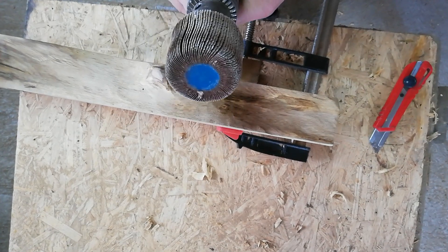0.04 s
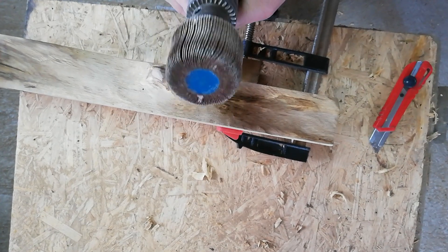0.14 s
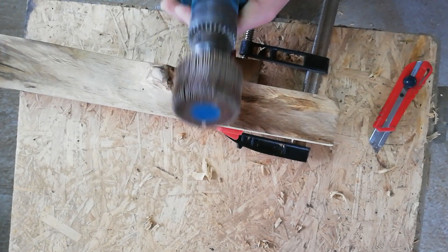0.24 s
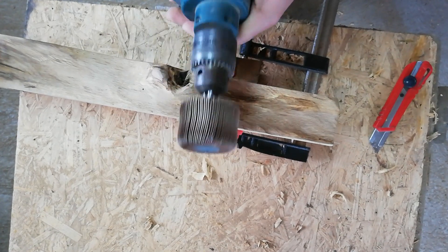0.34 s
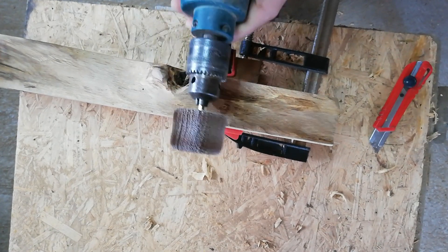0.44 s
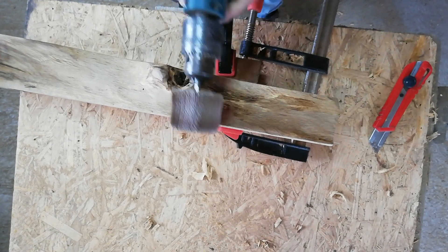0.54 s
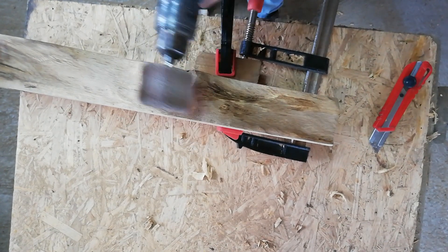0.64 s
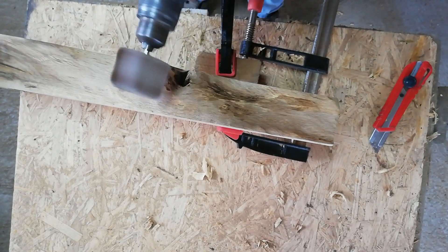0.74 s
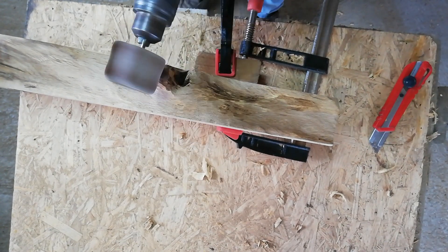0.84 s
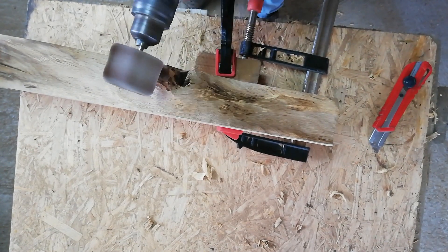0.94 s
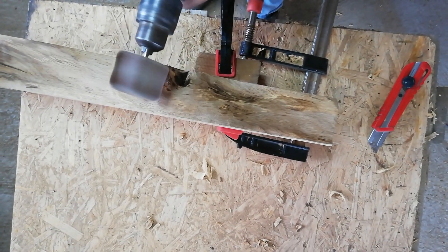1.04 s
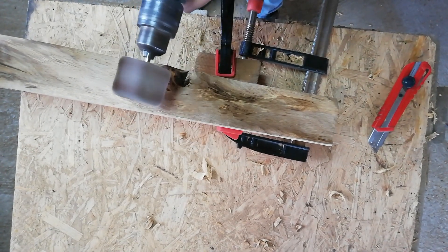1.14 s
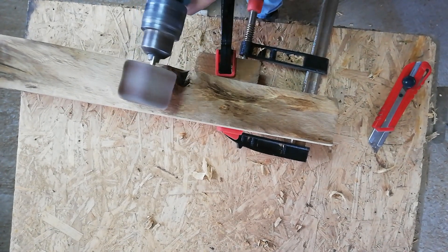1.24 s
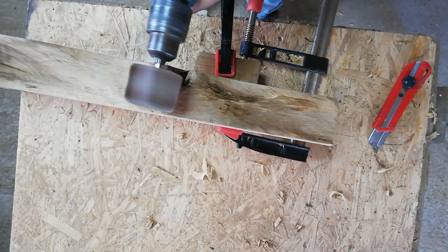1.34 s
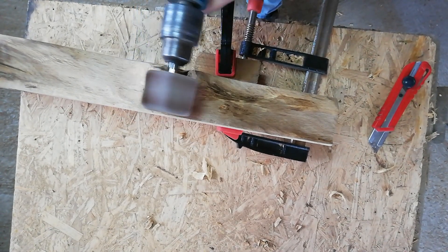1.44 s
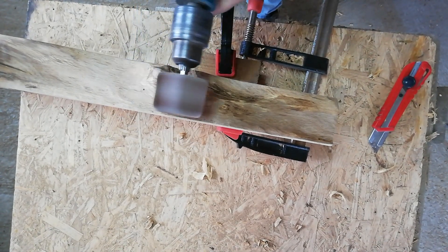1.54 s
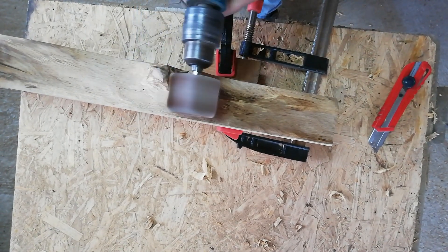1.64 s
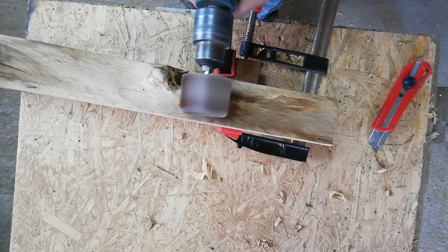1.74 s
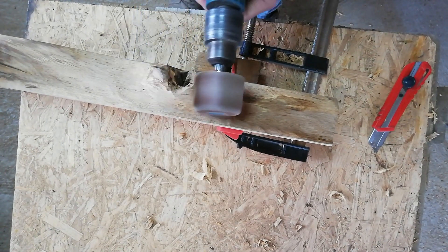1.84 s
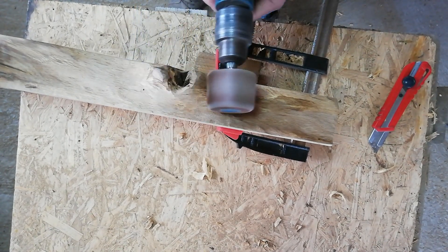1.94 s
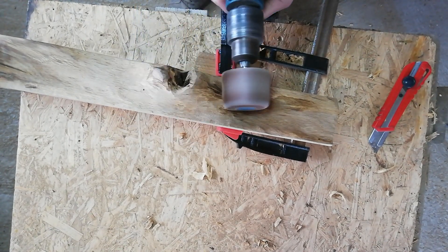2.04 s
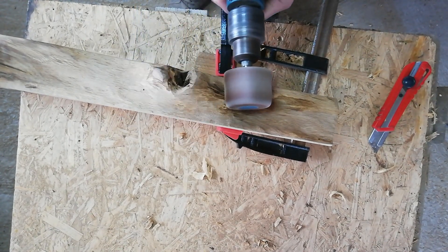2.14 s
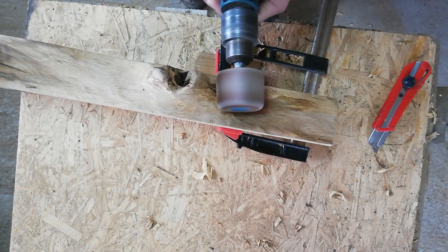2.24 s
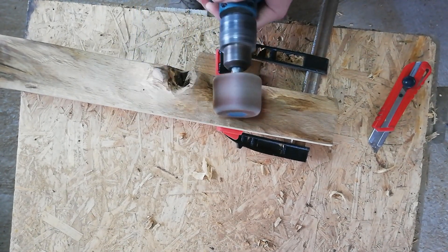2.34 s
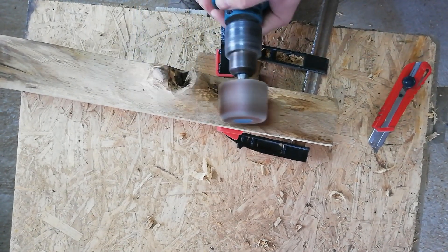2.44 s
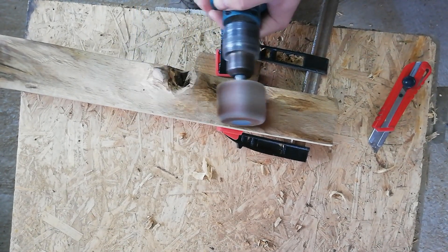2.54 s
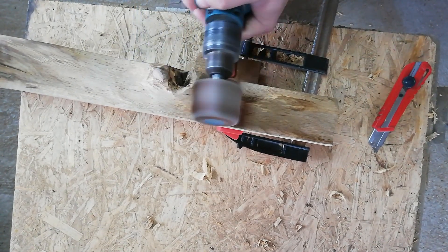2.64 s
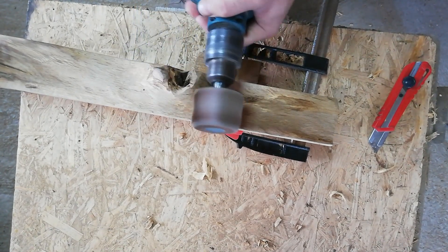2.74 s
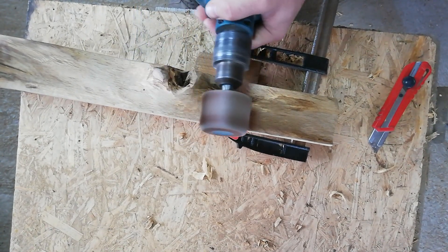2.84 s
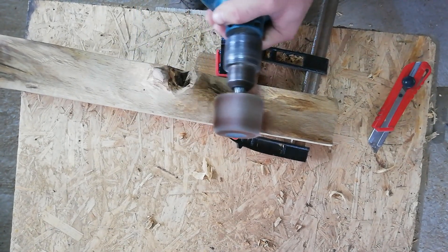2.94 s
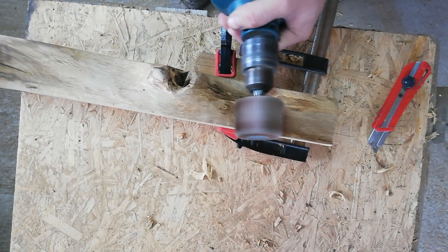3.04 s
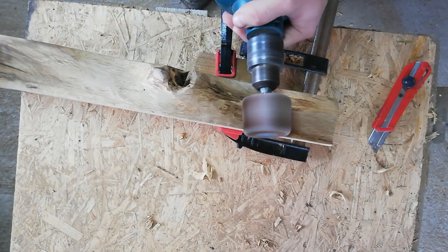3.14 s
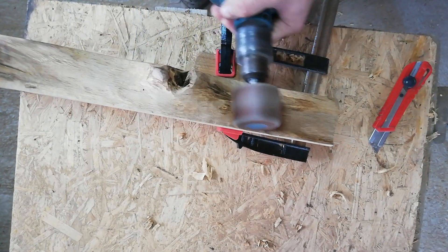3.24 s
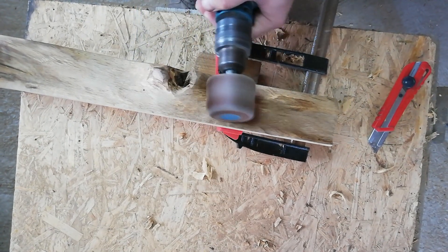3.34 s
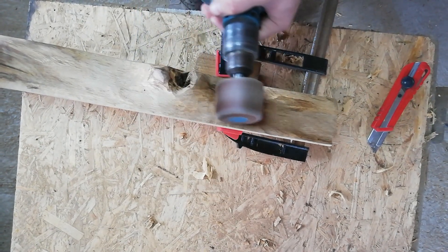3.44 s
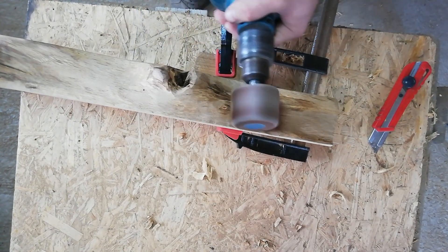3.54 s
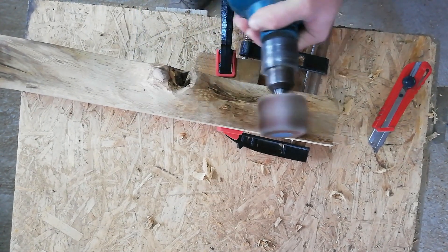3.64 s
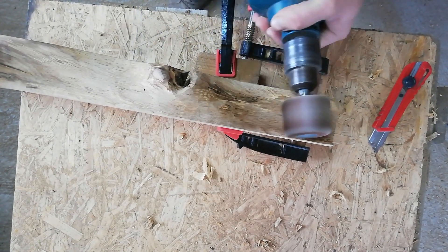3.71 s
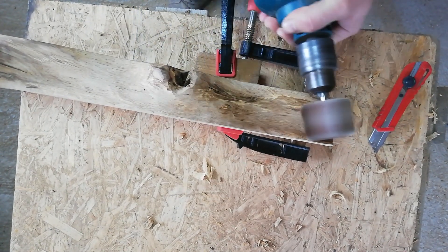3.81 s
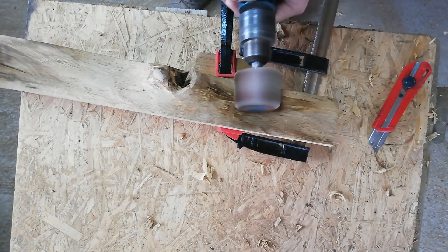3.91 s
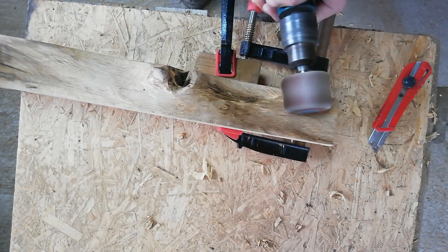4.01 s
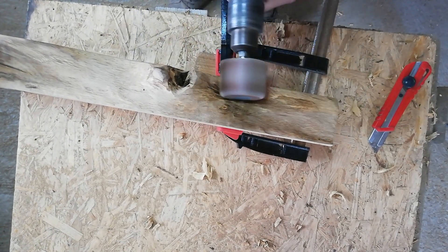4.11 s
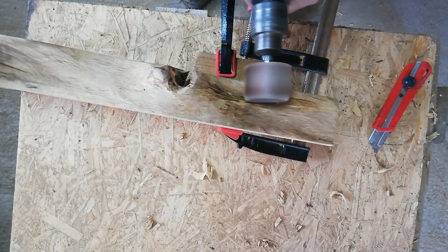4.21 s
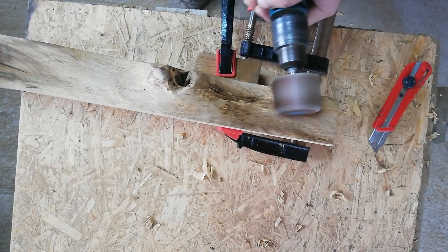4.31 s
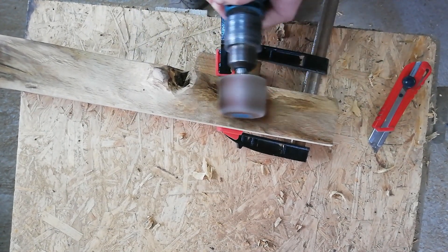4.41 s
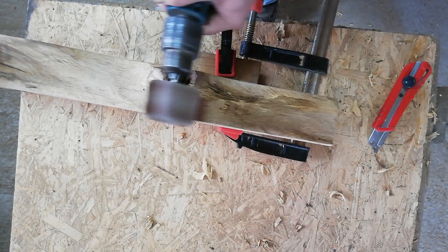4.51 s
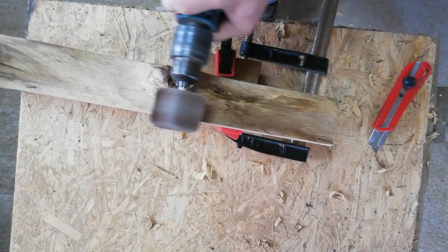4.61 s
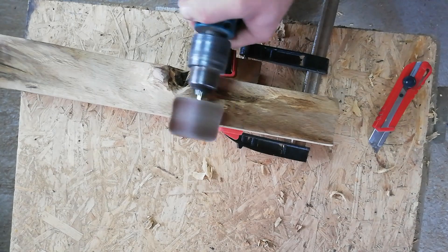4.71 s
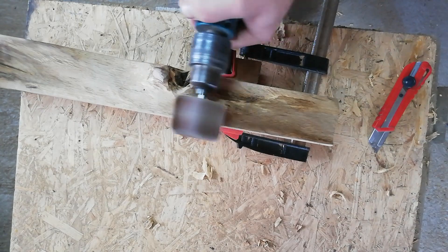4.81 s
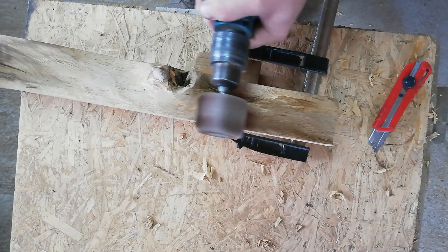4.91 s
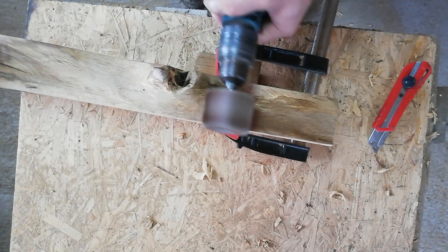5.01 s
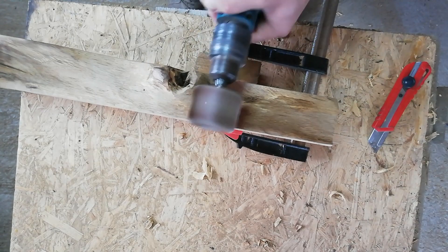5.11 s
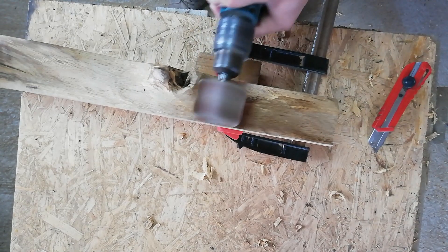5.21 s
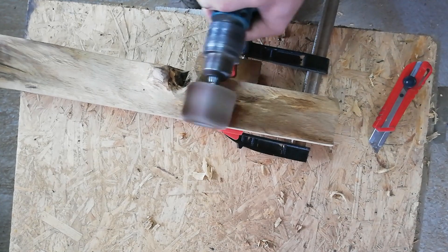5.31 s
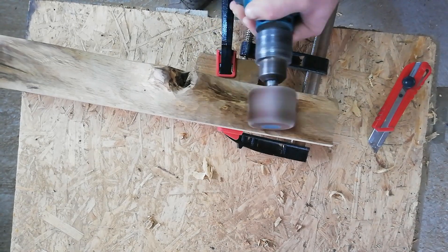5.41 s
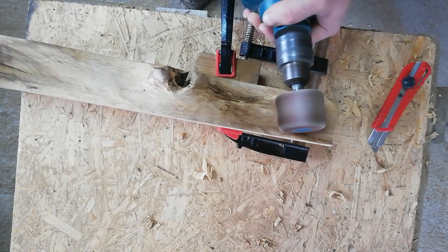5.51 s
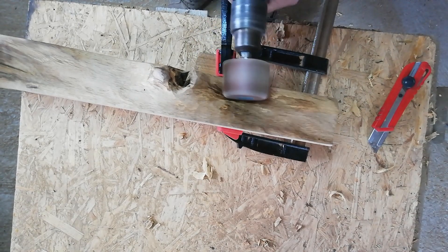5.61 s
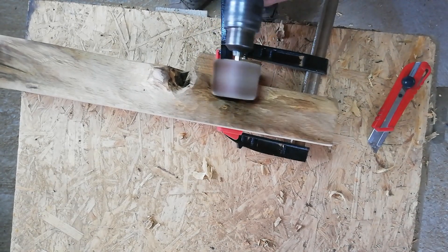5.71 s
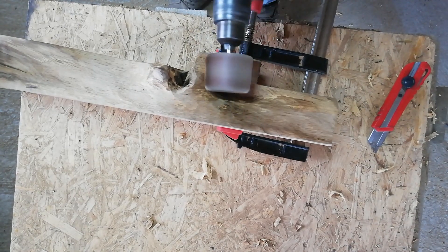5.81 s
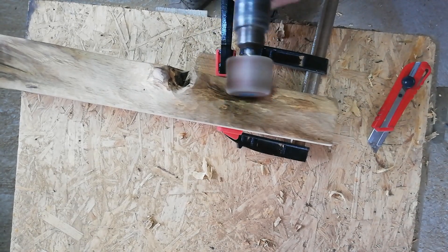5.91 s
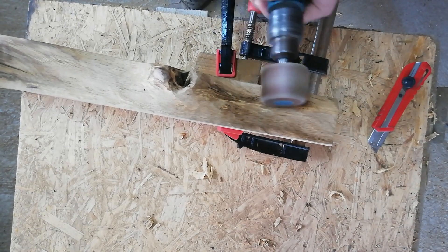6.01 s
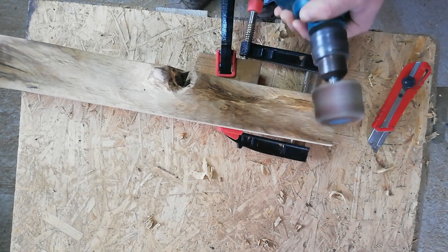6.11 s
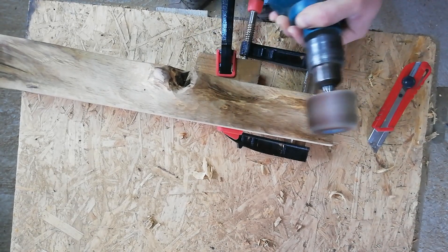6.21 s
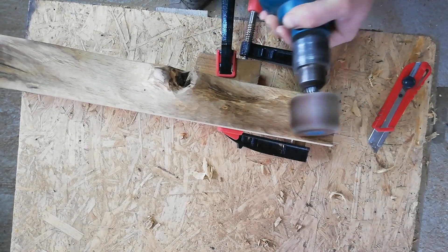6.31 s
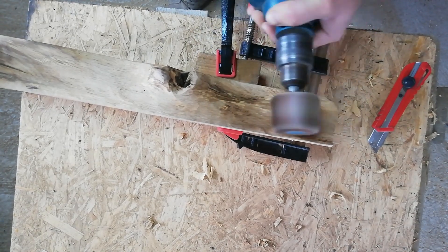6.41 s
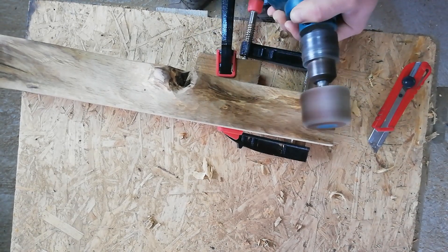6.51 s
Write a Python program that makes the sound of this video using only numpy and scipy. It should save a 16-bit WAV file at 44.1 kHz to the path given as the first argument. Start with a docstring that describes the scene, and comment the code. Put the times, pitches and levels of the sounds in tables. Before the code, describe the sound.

Corded drill spins up with rattling gears, then whines unevenly under load with rushing air and abrasive hiss, briefly cutting out before continuing.

```python
"""A mains drill spins a flap sanding wheel over a plank in a quiet workshop. First a low drone (a wavering
sine) swells once over coloured-noise room tone, a soft noise rustle follows, and trigger clicks ring plastic.
Gears jerk into motion (knocks ringing the case) and the drone fades; a whine of rotor harmonics rises and sags
under load, with hissing cooling air and grit, gears rattling at twice the mains rate, and one short scrape.
The sound breaks off for a moment, then returns with both channels alike and runs on to the end."""
import sys
import numpy as np
from scipy import signal
from scipy.fft import rfft, irfft
from scipy.io import wavfile
from scipy.ndimage import uniform_filter1d, map_coordinates

SR = 44100
rng = np.random.default_rng(int(sys.argv[2]) if len(sys.argv) > 2 else 0)


def persist_wave(psi):
    """Save psi, clipped to +-1, as 16-bit WAV."""
    counts = np.round(np.clip(psi, -1, 1) * 32767).astype(np.int16)
    wavfile.write(sys.argv[1], SR, np.atleast_2d(counts).T)


N = 288855
T = np.arange(N) / SR
HZ = np.fft.rfftfreq(N, 1 / SR)
PULSE_HZ = 100  # torque and current pulses, twice the mains rate
TOP_HZ = 15900
FULL_SPEED_HZ = 385
OPPOSED = np.array([[1], [-1]])  # opposite sign in left and right


def undb(db):
    """Gain of a level in dB."""
    return 10 ** (np.asarray(db) / 20)


def level(x, db):
    """Scale to an rms level."""
    return x * undb(db) / np.sqrt(np.mean(x ** 2))


def curves(rows, silent_db=None):
    """Columns of a timed table, interpolated to every sample."""
    s, *columns = np.transpose(rows)
    return [np.interp(T, s, column, silent_db, silent_db) for column in columns]


def shape(table):
    """A spectrum table interpolated to every frequency bin."""
    hz, value = np.transpose(table)
    return np.interp(np.log(HZ + 20), np.log(hz + 20), value)


def filtered_noise(gain):
    """White noise weighted by a gain per frequency bin, at rms 1."""
    return level(irfft(rfft(rng.standard_normal(N)) * gain, N), 0)


def noise(table):
    """Noise of rms 1 with the colour of a spectrum table."""
    return filtered_noise(undb(shape(table)))


def band(hz, octaves):
    """Noise of rms 1 in a bell-shaped band."""
    return filtered_noise(np.exp(-(np.log2((HZ + 1) / hz) / octaves) ** 2))


def walk(rate_hz):
    """Random levels held for one period of the rate and slewed twice; spread near 1."""
    hold = int(SR / rate_hz)
    steps = np.repeat(rng.standard_normal(N // hold + 1), hold)
    return 1.416 * uniform_filter1d(uniform_filter1d(steps, hold), hold)[:N]


def bump(start_s, end_s):
    """A smooth swell between two times."""
    part = np.linspace(0, 1, 101)
    return np.interp(T, start_s + part * (end_s - start_s), np.abs(np.sin(np.pi * part)) ** .7, 0, 0)


# Room tone colour. Each row: frequency in Hz, relative density in dB per Hz.
SHOP_SPECTRUM = [(30, -34), (60, -32), (97, -35), (136, -30), (200, -38), (389, -41), (575, -51),
                 (700, -47), (850, -41), (2180, -47), (8060, -44), (15500, -56)]
SHOP_DB, SHOP_APART = -66, .6


def shop():
    """Steady room tone: one noise common to both channels, a weaker one opposed in them."""
    return undb(SHOP_DB) * (noise(SHOP_SPECTRUM) + SHOP_APART * noise(SHOP_SPECTRUM) * OPPOSED)


DRONE_HZ, DRONE_DB = 65.4, -58.5
SWELL_START_S, SWELL_END_S, SWELL_DB = 0.26, 0.52, 4.9


def drone():
    """A low sine, unsteady in pitch and level, swells once and fades out by 1.5 s."""
    gain = undb(DRONE_DB + SWELL_DB * bump(SWELL_START_S, SWELL_END_S) + 3.1 * walk(8.3))
    phase = 2 * np.pi * np.cumsum(DRONE_HZ + 3.25 * walk(11.0)) / SR
    return gain * np.sin(phase) * np.clip((1.5 - T) / 0.17, 0, 1)


# Spells of bench rumble and floor thud.
# Each row: start in seconds, end in seconds, selector in Hz (above 80 bench, else floor), gain in dB.
RUMBLES = [(2.514, 2.8, 120, -59), (3.23, 3.72, 49, -50), (4.406, 4.517, 120, -48),
           (4.567, 4.774, 120, -49), (5.222, 5.37, 120, -56), (5.445, 6.426, 120, -50.5),
           (6.297, 6.5, 49, -63)]
BENCH_DB, FLOOR_DB, SHAKE_DB = -63.5, -62.5, 5
RUMBLE_FALL_DB_PER_OCTAVE = 4


def bench_and_floor(hz):
    """Bench and floor shake in low bands, less as the rotor slows; timed spells add to it."""
    bench, floor = band(115.0, 0.49), band(46.4, 0.39)
    shake = undb(BENCH_DB + SHAKE_DB * walk(24.21)) * bench
    shake += undb(FLOOR_DB + SHAKE_DB * walk(11)) * floor
    shake *= undb(RUMBLE_FALL_DB_PER_OCTAVE * np.log2(hz / FULL_SPEED_HZ))
    for start_s, end_s, selector_hz, db in RUMBLES:
        shake += undb(db) * bump(start_s, end_s) * (bench if selector_hz > 80 else floor)
    return shake


RUSTLE_START_S, RUSTLE_END_S, RUSTLE_DB = 0.89, 1.84, -48.5


def rustle():
    """A soft rustle: a bright and a weaker middle noise band under one flickering swell."""
    gain = undb(RUSTLE_DB + 1.0 * walk(29.5)) * bump(RUSTLE_START_S, RUSTLE_END_S) ** 2
    return gain * (band(6200, 0.91) + .5 * band(1970, 1.0))


SCRAPE_START_S, SCRAPE_LENGTH_S, SCRAPE_HZ, SCRAPE_DB = 2.165, .013, 3700, -18


def scrape():
    """A short bright scrape: a gated noise band."""
    gate = (T > SCRAPE_START_S) * (T < SCRAPE_START_S + SCRAPE_LENGTH_S)
    return undb(SCRAPE_DB) * band(SCRAPE_HZ, 0.62) * gate


def ring(blows, modes):
    """A body rings with its modes; too small to radiate bass, dead between its low and middle modes."""
    t = T[:SR // 8]
    response = sum(undb(db) * np.sin(2 * np.pi * hz * t) * 1000 ** (-t / t60_s) for hz, db, t60_s in modes)
    no_bass = signal.butter(2, 250, "high", fs=SR, output="sos")
    dead_gap = signal.butter(1, (540, 800), "bandstop", fs=SR, output="sos")
    rung = signal.fftconvolve(blows, response / np.abs(response).max())[:N]
    return signal.sosfilt(np.vstack([no_bass, dead_gap]), rung)


# Modes of the trigger plastic, then of housing and gear case.
# Each row: frequency in Hz, relative strength in dB, t60 in seconds.
TRIGGER_MODES = [(356, -5, 0.073), (440, 0, .04), (900, 1, .03), (1445, -2, 0.067), (1960, -2, 0.05),
                 (3260, -10, 0.022)]
CASE_MODES = [(330, -7, .04), (390, -4, .05), (455, -7, .04), (820, -13, .04), (890, 0, .06), (990, 3, .06),
              (1045, 0, .05), (1170, -6, .05), (1250, -5, .04), (1350, -2, .045), (1480, -5, .035),
              (1670, -8, .025), (2000, -8, .015)]
# Trigger clicks, then first jerks of the gears.
# Each row: time in seconds, relative strength in dB, crack against that strength in dB.
TRIGGER_CLICKS = [(1.214, -23, 2), (1.231, -30, -2), (1.284, -34, 9), (1.32, -26, -1)]
GEAR_KNOCKS = [(1.337, -17.5, 2), (1.356, -14, -0.5), (1.373, -9, -3), (1.384, -17, 2), (1.393, -11, -0.5),
               (1.424, -17.5, 9), (1.435, -24.5, 5)]


def knocks():
    """Each click or knock is a few ms of noise crack that also rings the trigger or the case."""
    rings, cracks = np.zeros(N), np.zeros(N)
    for hits, modes in ((TRIGGER_CLICKS, TRIGGER_MODES), (GEAR_KNOCKS, CASE_MODES)):
        blows = np.zeros(N)
        for s, db, crack_db in hits:
            blows[int(s * SR)] = undb(db)
            cracks[int(s * SR)] = undb(db + crack_db)
        rings += 0.64 * ring(blows, modes)
    crack_decay = np.convolve(cracks, np.exp(-T[:900] / 0.0066))[:N]
    return rings + 0.31 * crack_decay * band(1970, 1.55)


# Spells of harder gear rattle. Each row: start in seconds, end in seconds, added gain in dB.
RATTLE_SPELLS = [(1.353, 1.477, -33.5), (1.701, 2.179, -36)]
RATTLE_DB = -42.5


def gears(running):
    """Torque pulses at twice the mains rate chatter the teeth unevenly, every other pulse harder."""
    at_s = np.arange(0, T[-1] - .02, 1 / PULSE_HZ)
    jitter, strength = rng.standard_normal((len(at_s), 2)).T
    alternate = (-1) ** np.arange(len(at_s))
    blows = np.zeros(N)
    blows[np.abs((at_s + .0012 * jitter) * SR).astype(int)] = undb(1.7 * strength + 2.2 * alternate)
    chatter = np.convolve(blows, np.exp(-T[:500] / 0.0082))[:N] + 0.14
    gain = undb(RATTLE_DB) * running
    gain += sum(undb(db) * bump(start_s, end_s) ** 0.12 for start_s, end_s, db in RATTLE_SPELLS)
    return gain * level(ring(chatter * band(1740, 2.64), CASE_MODES), 0)


# Air against speed. Each row: rotor speed in Hz, gain in dB.
BLAST = [(190, -31), (230, -28.5), (290, -25), (350, -22), (400, -20.5)]
# The vents turn towards the microphone and away. Each row: time in seconds, gain in dB.
VENTS = [(1.4, 2.5), (1.62, 1), (1.75, 3.5), (1.95, -1), (2.2, 0.5), (2.75, -2), (3.1, 0.5), (4.2, -0.5),
         (4.45, -0.5), (5.05, -3), (5.45, -0.5), (6.55, -2.5)]
PULL_DB, HARD_PULL_HZ_PER_S = 0.5, 800


def air_level_db(hz):
    """Air gain follows rotor speed and vent direction, with a little more while the rotor speeds up."""
    rise_hz_per_s = np.gradient(np.roll(hz, int(0.0045 * SR))) * SR
    pull = np.clip(rise_hz_per_s / HARD_PULL_HZ_PER_S, 0, 1)
    blast_db = np.interp(hz, *np.transpose(BLAST))
    return blast_db + PULL_DB * uniform_filter1d(pull, int(.15 * SR)) + curves(VENTS)[0]


# Air and grit colour. Each row: frequency in Hz, relative density in dB per Hz.
AIR_SPECTRUM = [(40, -91), (200, -29.5), (500, -28), (700, -22.5), (900, -21.5), (1300, -16), (2200, -13.5),
                (3200, -11.5), (4300, -9), (5300, -11), (6500, -8.5), (9200, -10), (10000, -17.5),
                (13000, -25), (15500, -30.5)]
# Air reaching the ports by different paths. Each row: frequency in Hz, gain in dB.
SPREAD = [(500, -9), (1200, -6), (2500, -5), (5000, -3), (8000, -12), (15000, -9)]


def spread_air(air_db):
    """Air that reaches the two ports by different paths: a further noise, opposed in the channels."""
    unlike = irfft(rfft(noise(AIR_SPECTRUM)) * undb(shape(SPREAD)), N)
    return unlike * undb(air_db + 1.5) * OPPOSED


PATCH_DB, PATCH_S, PATCH_OCTAVES = 1.5, .06, .2  # grain of the hiss


def air(turn):
    """Fan wind and grit on wood: spectral patches surge and sink at random, each rotor turn pulses them."""
    hz, s, cells = signal.stft(noise(AIR_SPECTRUM), SR, nperseg=512)
    where = np.meshgrid(np.log2(hz + 200) / PATCH_OCTAVES, s / PATCH_S, indexing="ij")
    patches = map_coordinates(rng.standard_normal((200, 400)), where, order=1, mode="wrap")
    hiss = signal.istft(cells * undb(PATCH_DB * patches), SR, nperseg=512)[1][:N]
    return level(hiss * undb(0.57 * walk(60)) * (1 + 0.16 * np.sin(turn)), 1.44)


# Trigger and pressure on the plank change.
# Each row: time in seconds, speed the rotor heads for in Hz, its time constant in seconds.
LOADS = [(1.364, 372, .355), (1.416, 166, .316), (1.693, 214, .405), (1.999, 328, .113), (2.183, 50, 1.446),
         (2.737, 390, .209), (3.082, 50, 1.227), (3.47, 389, .245), (4.4, 417, 1.5), (4.857, 167, .465),
         (5.087, 374, .08), (5.189, 244, .151), (5.318, 383, .091), (6.172, 450, 1.492)]
START_HZ, EASE_S = 198, .035


def speed():
    """The rotor runs exponentially towards each new speed; a moving average rounds the corners."""
    hz, now = np.full(N, float(START_HZ)), START_HZ
    for (s, aim, lag_s), (until_s, _, _) in zip(LOADS, LOADS[1:] + LOADS[-1:]):
        hz[T >= s] = aim + (now - aim) * np.exp(-(T[T >= s] - s) / lag_s)
        now = aim + (now - aim) * np.exp(-(until_s - s) / lag_s)
    return uniform_filter1d(hz, int(EASE_S * SR))


def rotor_angle(hz):
    """Rotor phase in radians, with slight random speed jitter."""
    return 2 * np.pi * np.cumsum(hz * (1 + 0.001458 * walk(30))) / SR


BLADES_DB, BLADES_WIDTH_HZ = -33, 500


def fan_blades(turn, slow_octaves):
    """Twelve fan blades chop the air into a rough band, weaker at lower speed."""
    gain = undb(BLADES_DB + 11.0 * slow_octaves + 0.65 * walk(1.8))
    return gain * walk(BLADES_WIDTH_HZ) * np.sin(12 * turn)


# The motor draws a surge of current. Each row: start in seconds, end in seconds, relative level in dB.
BUZZES = [(2.01, 2.175, -30), (2.755, 2.89, -31), (3.45, 3.6, -32), (5.26, 5.345, -33)]


def commutator(turn):
    """The commutator buzzes on the twelfth harmonic, beating with the current at twice the mains rate."""
    current = np.sin(np.pi * PULSE_HZ * T) ** 2
    surge = sum(undb(db) * bump(start_s, end_s) for start_s, end_s, db in BUZZES)
    return surge * (.25 + 3.6 * current) * undb(2.8 * walk(73)) * np.sin(12 * turn + 1.1 * walk(300))


# Housing resonances. Each row: centre in Hz, width in Hz, lift in dB.
HOUSING = [(1165, 60, 13), (1650, 150, 4), (1970, 60, 10), (2400, 120, 5), (3450, 50, 11), (4750, 110, 8),
           (7500, 350, 6), (9250, 250, 10), (14400, 500, 4)]


def housing_db(hz):
    """Lift of a tone as it passes the housing resonances."""
    grid = np.arange(0, SR / 2, 5)
    lift = sum(db * np.exp(-((grid - centre) / width) ** 2) for centre, width, db in HOUSING)
    return np.interp(hz, grid, lift)


# Faint harmonic. Each row: multiple of rotor speed, base level in dB, fall in dB per octave of lost speed.
FAINT_HARMONICS = [(6, -46, 15.5)]
# Upper harmonics of the rotor, each coming and going unevenly over time.
# Each row: time in seconds, then base level in dB of each multiple listed in UPPER_MULTIPLES.
UPPER_MULTIPLES = (12, 20, 24, 37, 48)
UPPER = [(1.4, -54, -60, -60, -42, -52), (1.54, -44, -60, -62, -43, -46), (1.66, -43, -60, -60, -44, -48),
         (1.74, -58, -60, -54, -44, -50), (1.82, -62, -60, -46, -46, -54), (1.96, -64, -60, -45, -52, -58),
         (2.05, -58, -58, -54, -48, -62), (2.3, -54, -52, -48, -44, -66), (2.65, -58, -52, -48, -42, -66),
         (2.8, -52, -50, -46, -35, -66), (3.07, -50, -48, -42, -50, -70), (3.3, -50, -48, -44, -39, -70),
         (3.6, -48, -44, -38, -41, -70), (4.2, -48, -46, -42, -42, -70), (4.8, -48, -48, -42, -44, -70),
         (5.08, -52, -46, -42, -38, -70), (5.3, -54, -50, -44, -39, -70), (5.42, -50, -38, -46, -44, -70),
         (5.9, -47, -40, -44, -43, -70), (6.15, -47, -52, -48, -48, -70), (6.55, -47, -52, -46, -41, -70)]


def upper_harmonics(hz, turn, slow_octaves, strain):
    """Tones on rotor multiples flicker, waver in phase and swell on housing resonances."""
    flicker_db, waver = 4 * walk(45) + 1.8 * walk(10), .75 * walk(90)
    upper = [(k, db, 0) for k, db in zip(UPPER_MULTIPLES, curves(UPPER))]
    out = np.zeros(N)
    for k, db, fall_db in FAINT_HARMONICS + upper:
        shift = k * 7919  # samples; gives each tone its own flicker
        lift_db = fall_db * slow_octaves + housing_db(k * hz) + np.roll(flicker_db, shift)
        phase = k * turn + (1 + strain) * np.roll(waver, shift)
        out += undb(db + lift_db) * (k * hz < TOP_HZ) * np.sin(phase)
    return out


# Lower harmonics of the rotor, each swelling and fading unevenly over time.
# Each row: time in seconds, then base level in dB of each multiple listed in LOWER_MULTIPLES.
LOWER_MULTIPLES = (1, 3, 4, 5, 7, 8, 9)
WHINE = [(1.4, -55, -60, -37, -47, -53, -50, -45), (1.7, -51.5, -63, -57, -45, -44, -46, -41),
         (1.95, -58, -69, -64, -35.5, -58, -58, -53), (2.05, -63, -56, -25, -48, -57, -58, -58),
         (2.2, -50.5, -50, -40, -41, -42, -54, -58), (2.45, -53, -54, -42.5, -42, -41, -39.5, -52),
         (2.75, -49.5, -58, -42, -45, -43, -42, -56), (2.85, -46, -43, -35, -38, -51, -39, -58),
         (2.95, -44, -58, -32.5, -35, -58, -38, -42), (3.07, -35, -58, -26.5, -43, -40, -39, -42),
         (3.17, -45, -58, -26.5, -38, -38, -47, -45), (3.28, -52, -59, -23.5, -36, -33, -40, -58),
         (3.38, -52, -59, -29, -50, -50, -41, -58), (3.47, -48, -62, -38.5, -51, -47, -24, -58),
         (3.57, -47, -63, -24.5, -41, -38, -39, -52), (3.66, -44, -55, -26.5, -47, -38, -37, -51),
         (3.75, -38, -62, -25, -50, -58, -28, -58), (3.87, -37, -49, -20.5, -45, -47, -37, -47),
         (4.0, -35.5, -49, -20.5, -48, -52, -29, -55), (4.12, -43.5, -42, -23, -32, -49, -39, -44),
         (4.22, -42, -46.5, -23.5, -43, -56, -27, -33.5), (4.42, -34.5, -28, -17.5, -44, -50, -30, -43),
         (4.52, -33.5, -34.5, -21.5, -43, -37, -40, -37), (4.64, -37.5, -35.5, -18, -33, -43, -38, -42),
         (4.76, -40.5, -43, -23, -41, -37, -39, -46), (4.85, -44, -37.5, -21, -34, -38, -26, -43),
         (4.93, -35, -37, -26, -49, -35, -34, -41), (5.01, -48, -47, -28, -43, -39, -31, -48),
         (5.09, -50, -58, -19.5, -28, -40, -35, -51), (5.17, -34.5, -49, -27.5, -46, -47, -35, -58),
         (5.24, -45, -56, -27.5, -42, -37, -33, -58), (5.3, -53, -50, -36.5, -40, -43, -37, -58),
         (5.38, -38, -45, -21, -47, -43, -27.5, -41), (5.46, -34, -56, -29.5, -48, -58, -28, -58),
         (5.56, -37, -45, -33, -35, -58, -28.5, -34), (5.66, -40, -55, -21.5, -32, -34, -40, -28),
         (5.76, -37.5, -38.5, -16, -54, -41, -29, -29.5), (5.88, -36.5, -38.5, -16.5, -26.5, -33, -32, -43),
         (6.02, -42, -50, -16.5, -47, -46, -35, -26), (6.12, -49, -38, -19, -40, -30, -39, -45),
         (6.22, -34, -39, -29.5, -34, -51, -40, -45), (6.31, -36.5, -36, -22.5, -39, -48, -26, -45),
         (6.41, -34, -33.5, -31.5, -25, -34, -42, -47), (6.5, -37.5, -40, -25.5, -21.5, -44, -33, -43)]


def lower_harmonics(turn, strain):
    """Unbalance once a turn and whine on low multiples; speed changes shake the fourth and eighth."""
    lower = dict(zip(LOWER_MULTIPLES, curves(WHINE)))
    unbalance_db, whine_db, octave_db = lower.pop(1), lower.pop(4), lower.pop(8)
    out = undb(unbalance_db + 1.96 * walk(25)) * np.sin(turn)
    for k, db in lower.items():
        out += undb(db + 2.9 * walk(30)) * np.sin(k * turn + 0.091 * k * walk(50))
    octave_phase = 8 * turn + (.5 + .6 * strain) * walk(70)
    out += undb(octave_db + (2.2 + 1.5 * strain) * walk(60)) * np.sin(octave_phase)
    whine_phase = 4 * turn + (0.3 + 0.8 * strain) * walk(55)
    out += undb(whine_db + (1.3 + 3.5 * strain) * walk(75)) * np.sin(whine_phase)
    return out


def rotor(hz, turn):
    """The motor's voice: harmonics of rotor speed, commutator buzz and blade chop."""
    strain = np.clip(np.abs(np.gradient(hz)) * SR / 250, 0, 1)  # full at 250 Hz per s
    slow_octaves = np.log2(hz / FULL_SPEED_HZ)  # negative below full speed
    tones = lower_harmonics(turn, strain) + upper_harmonics(hz, turn, slow_octaves, strain)
    return tones + commutator(turn) + fan_blades(turn, slow_octaves)


# Lag between the microphone ports. Each row: frequency in Hz, phase lead of left in radians.
PORT_LEAD = [(0, 0), (300, -.2), (700, -.6), (1500, -.55), (2400, -1.4), (4500, -1.5), (5600, -1.2),
             (6800, -.3), (15600, -.2)]
# Tilt between the ports. Each row: frequency in Hz, left minus right in dB.
PORT_TILT = [(60, -1.5), (380, 2), (1290, 3), (2380, 1), (4400, 2), (8120, -6.5), (15000, -3)]
# Wall echoes. Each row: frequency in Hz, gain in dB.
WALLS = [(60, -24), (400, -17), (800, -8), (1400, -13), (2500, -8), (5000, -8), (8000, -13), (15000, -11)]
WALLS_T60_S = 0.22


def ports(x):
    """Two microphone ports hear the drill with their own lag and tilt, and different wall echoes."""
    t = T[:int(.3 * SR)]
    tails = rng.standard_normal((2, len(t))) * 1000 ** (-t / WALLS_T60_S)
    tails /= np.sqrt(np.sum(tails ** 2, axis=1, keepdims=True))
    half = undb(shape(PORT_TILT) / 2) * np.exp(.5j * shape(PORT_LEAD))
    response = irfft(np.array([half, 1 / half]) + undb(shape(WALLS)) * rfft(tails, N), N)
    early = 2000  # samples kept ahead of the direct sound, for the phase leads
    response = np.roll(response, early, axis=1)[:, :SR // 2]
    return signal.fftconvolve(x[None], response, axes=1)[:, early:early + N]


def scene():
    """Workshop, bench and drill; only the drill, rustle and scrape pass through the port filters."""
    hz = speed()
    turn = rotor_angle(hz)
    air_db = air_level_db(hz)
    running = np.clip((T - 1.33) / 0.088, 0, 1) ** 2
    low = drone() + running * bench_and_floor(hz) + undb(-73.0) * band(35, .7)
    drill = running * (rotor(hz, turn) + undb(air_db) * air(turn))
    drill += gears(running) + knocks() + scrape() + rustle()
    return ports(drill) + running * spread_air(air_db) + low + shop()


BREAK_START_S, BREAK_END_S = 4.265, 4.355
FADE_OUT_S, FADE_IN_S = .0017, .0016  # time constants


def record(dry):
    """The sound drops out briefly and comes back folded to mono; the top is cut."""
    dry = np.where(T > (BREAK_START_S + BREAK_END_S) / 2, dry.mean(axis=0), dry)
    fade_out = np.exp(-np.clip(T - BREAK_START_S, 0, 1) / FADE_OUT_S)
    fade_in = np.exp(-np.clip(BREAK_END_S - T, 0, 1) / FADE_IN_S)
    gate = np.minimum(fade_out + fade_in, 1)
    return signal.sosfilt(signal.ellip(10, .2, 70, TOP_HZ, fs=SR, output="sos"), dry * gate)


dry = scene()
out = record(dry)
persist_wave(out)
```